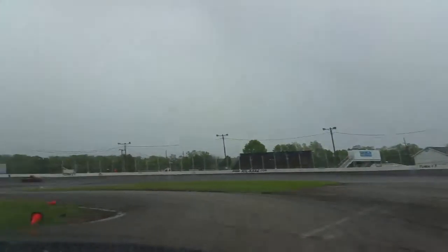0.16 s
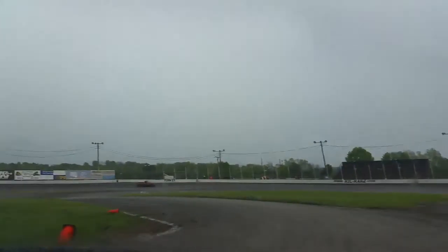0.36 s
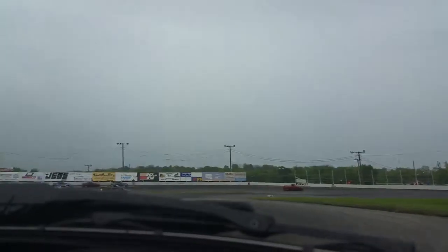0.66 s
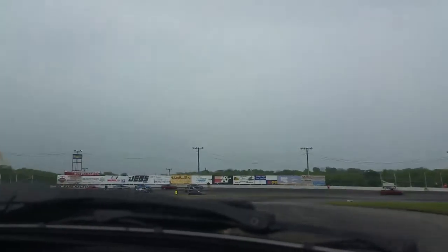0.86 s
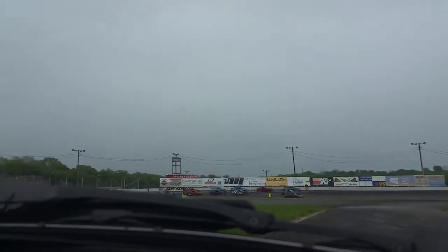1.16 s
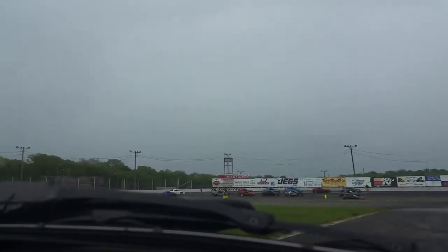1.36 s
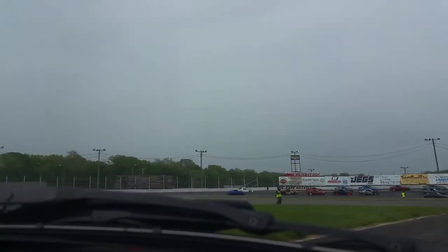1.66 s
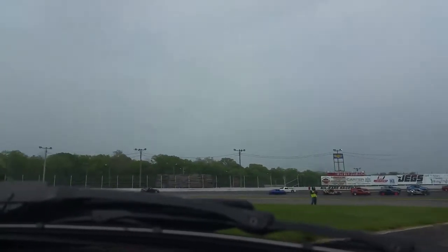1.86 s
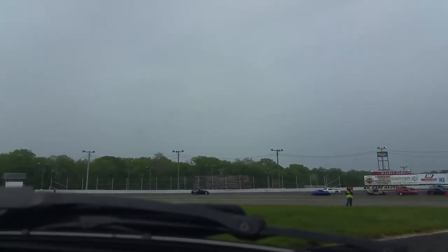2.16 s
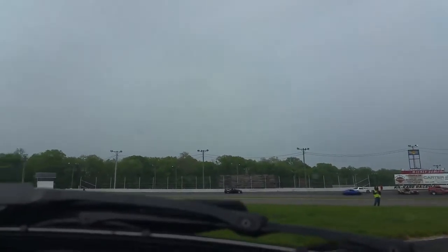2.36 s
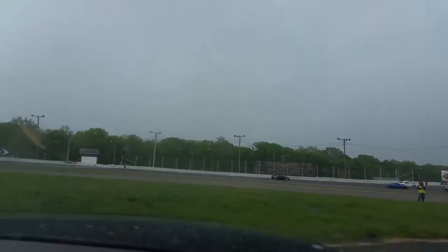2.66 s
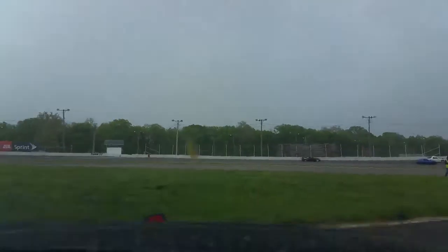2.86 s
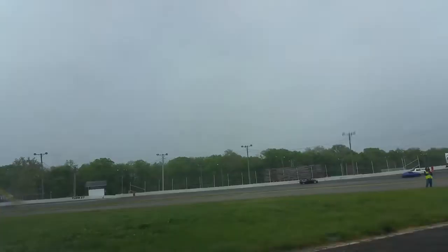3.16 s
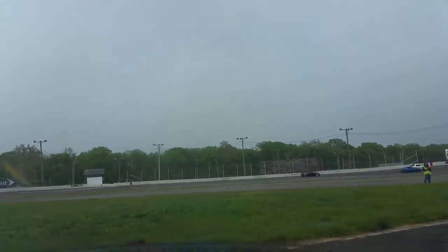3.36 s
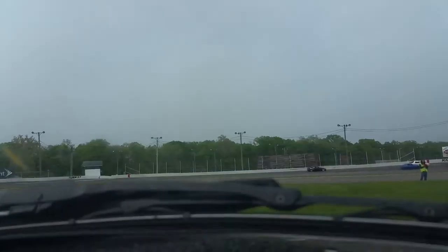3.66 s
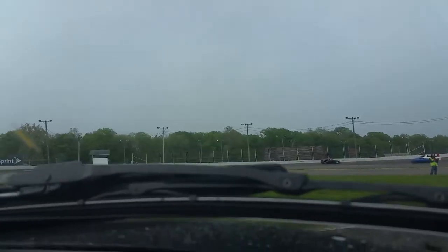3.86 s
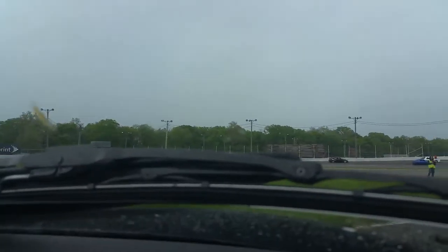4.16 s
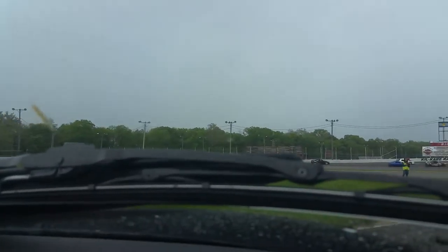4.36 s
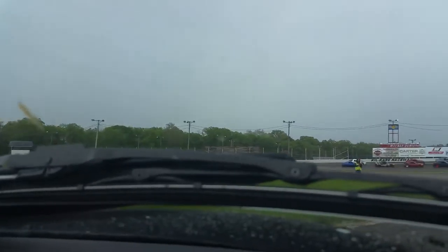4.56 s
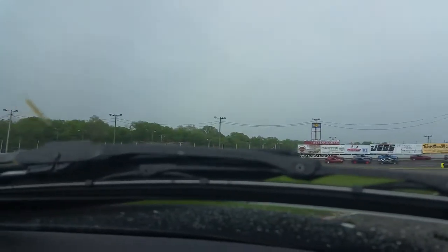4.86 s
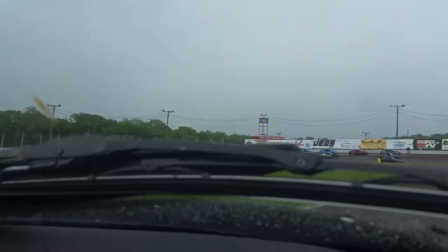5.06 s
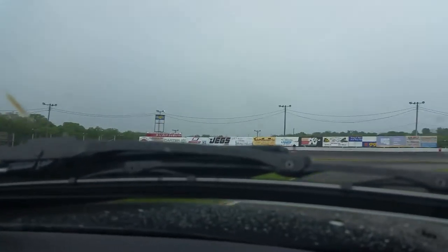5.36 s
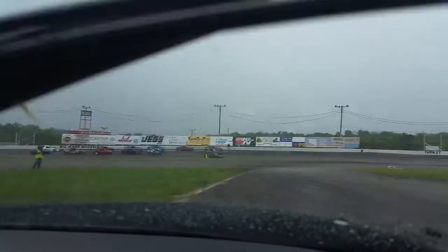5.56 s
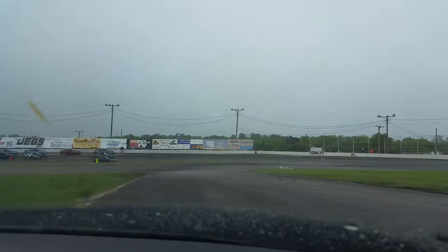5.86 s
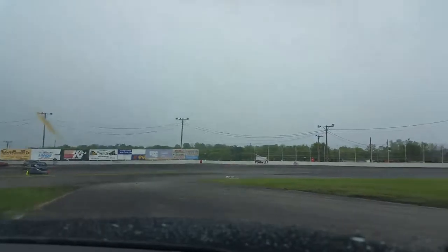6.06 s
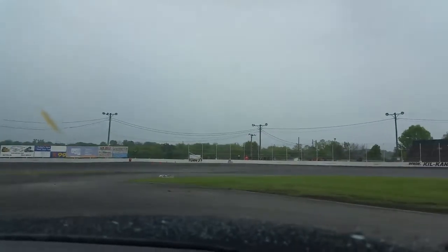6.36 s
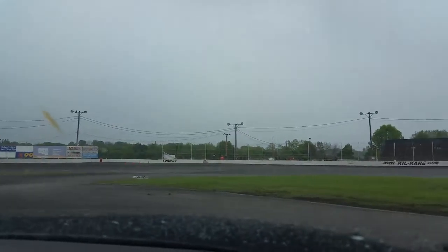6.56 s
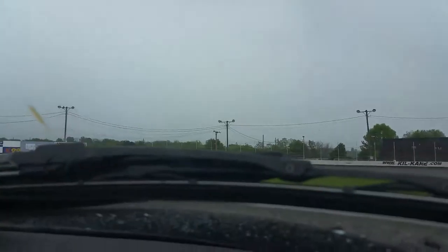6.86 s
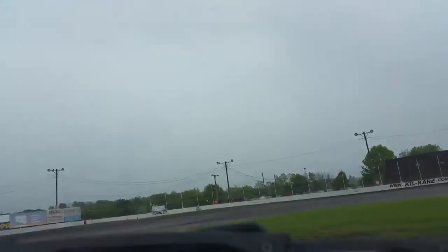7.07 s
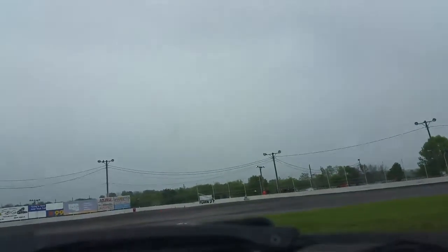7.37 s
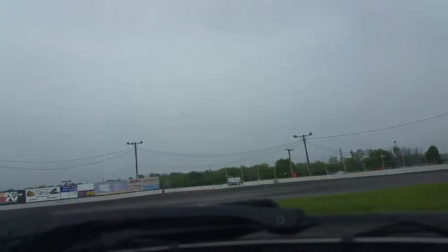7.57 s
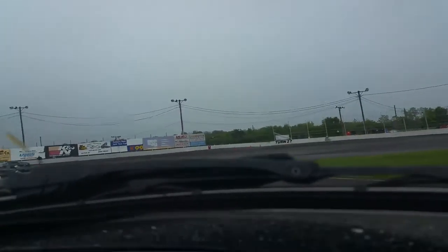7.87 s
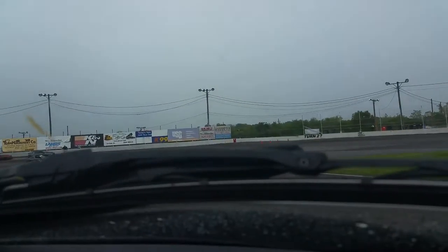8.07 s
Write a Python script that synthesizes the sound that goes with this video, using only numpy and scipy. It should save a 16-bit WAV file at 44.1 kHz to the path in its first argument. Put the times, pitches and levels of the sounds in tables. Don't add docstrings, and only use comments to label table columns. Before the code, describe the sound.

A V8 car heard from the dashboard: wide, wavering tyre howl for over two seconds, engine dropping beneath it. Quieter rolling follows with trim ticks and two sharp lever knocks. Then a fast rev, short double-pitched chirps, a drop, and a longer climbing roar with thinner squeal. Heavy thumps at the turn, gear whine, and a final growing slide over hissing water.

```python
import sys
import numpy as np
from scipy import signal
from scipy.fft import rfft, irfft
from scipy.io import wavfile
from scipy.ndimage import uniform_filter1d

SR = 44100
rng = np.random.default_rng(int(sys.argv[2]) if len(sys.argv) > 2 else 0)


def boost(x):
    u = np.asarray(x, float) / 20
    return 10 ** u


def digitize_waveform(pressure):
    field = np.atleast_2d(pressure).T
    bounded = np.clip(field, -1, 1)
    quanta = np.round(bounded * 32767).astype(np.int16)
    wavfile.write(sys.argv[1], SR, quanta)


N = 362061

# [t/s, stick-slip rate f/Hz, level/dB, overtone level/dB]
LONG_SLIDE = [
    (0, 913, -14, -18.5),
    (.2, 815.6, -16.5, -16),
    (.5, 779.2, -14.5, -16.5),
    (1.0, 847.4, -15, -15),
    (2.05, 861.5, -15, -15),
    (2.2, 876, -17, -18),
    (2.35, 881, -26, -22),
    (2.5, 879, -39, -11),
    (2.69, 866, -44.5, -12),
    (2.75, 870, -60, -9),
]
LEFT_CHIRP = [(4.46, 1065, -47, -2), (4.52, 1085, -30, -21), (4.58, 1060, -24, -10), (4.62, 1085, -27, -2),
              (4.7, 1098, -28, -2), (4.76, 1096, -31.5, -14), (4.83, 1112, -34, -18),
              (4.89, 1046, -31.5, 3.5), (4.93, 1092, -35.5, 3), (5.0, 1100, -46, 4), (5.08, 1105, -60, 4)]
RIGHT_CHIRP = [
    (4.46, 1226, -48, -16),
    (4.521, 1235, -24, -18),
    (4.58, 1210, -21.5, -18),
    (4.629, 1253, -32.5, -9),
    (4.70, 1244, -28, -38),
    (4.80, 1270, -27.5, -17),
    (4.839, 1230, -39, -14),
    (4.9, 1190, -40, 0),
    (4.95, 1210, -47, -15),
    (5.198, 1240, -40.5, -18),
]
POWER_SLIDE = [
    (5.15, 1271, -46, -3),
    (5.72, 1298, -39.5, -8),
    (5.95, 1287, -33, -14.5),
    (6.15, 1219, -30.5, -18),
    (6.4, 1212, -25.5, -16.5),
    (6.65, 1220, -26, -14),
    (6.85, 1221, -24.5, -13.5),
    (6.96, 1238, -33.5, -12.5),
    (7.05, 1263, -50, -11),
]
LAST_SLIDE = [
    (7.3, 1039, -54, -9),
    (7.45, 1070, -43, -7),
    (7.64, 1083, -39.5, -4),
    (7.72, 1069, -38, -1.5),
    (7.79, 1036, -26.5, -12),
    (7.95, 1033, -29, -8.5),
    (8.0, 1008, -24.5, -12.5),
    (8.08, 964, -26, -15.5),
    (8.21, 1018, -22.5, -11),
]

# [t/s, opening 0-1]
THROTTLE = [(0, .6), (.95, .5), (1.3, .2), (3.8, .15), (3.92, .85), (4.2, 1), (4.55, 1), (4.7, .5),
            (5.1, .7), (5.3, .95), (6.1, 1), (6.85, 1), (6.95, .5), (7.35, .7), (7.5, .9), (7.75, .9),
            (7.9, .6), (8.0, .9), (8.21, .95)]
# [t/s, f/Hz]
CYCLE_RATE = [(0, 20.2), (.1, 18.3), (.35, 13.7), (.55, 12.4), (.95, 11.2), (3.6, 10), (3.9, 11),
              (4.0, 15.2), (4.21, 19.7), (4.39, 21.5), (4.58, 20.2), (4.87, 12.5), (5.05, 8.9), (5.19, 9.6),
              (5.88, 15.6), (6.0, 18), (6.24, 21.6), (6.7, 25.6), (6.87, 25.9), (7.0, 20.7), (7.3, 17.4),
              (7.8, 14.7), (8.0, 14.6), (8.21, 13.8)]
FIRING_BANK = [1, -1, -1, 1, -1, 1, 1, -1]
CYLINDER_DB = [4, -6, 3.5, 2, 11, -0.5, -1, 12]
# [t/s, near-bank lead 0-1, cylinder unevenness (1 = usual)]
LUMP = [
    (0, 0.44, 0.7),
    (4.0, 0.1, .6),
    (4.4, 0.57, 0.86),
    (5.3, 0.47, 0.8),
    (6.2, 0.23, 0.74),
    (6.6, 0.65, 3.25),
    (7.2, 0.27, 1.2),
    (7.75, 0.32, 1.6),
    (8.0, .5, 0.5),
    (8.21, 0.37, 0.43),
]
# [t/s, boom level/dB, body shake level/dB]
EFFORT = [(0, -20, -2), (.35, -28.5, 0), (1.15, -28, 0), (1.3, -37.5, 0), (2.0, -33, 0), (2.6, -36.5, 0),
          (3.55, -32, 0), (3.63, -26.5, 0), (3.88, -27, 0), (4.0, -14, 0), (4.55, -16.5, -1),
          (4.75, -22, 1), (5.5, -21.5, 1), (6.1, -14, 1), (6.85, -14.5, -2), (7.3, -20.5, 3),
          (7.93, -22, 0), (8.21, -15.5, -2)]
# [f/Hz, level/dB]
CABIN_RESPONSE = [(15, -31.5), (25, -9.5), (81, -0.5), (124, -3), (155, 3), (198, -2), (226, 3), (243, -9),
                  (264, -11.5), (308, -10.5), (358, -15), (412, -8.5), (530, -21), (576, -22), (700, -44.5),
                  (910, -90), (1540, -120)]
# [f/Hz, width/Hz, level over broad response/dB]
CABIN_MODES = [(96, 18, 3), (163, 26, 3), (236, 34, 10), (408, 30, 8), (465, 30, 4), (575, 30, 6)]
# [multiple of cycle, mode f/Hz, width/Hz, gain/dB]
DRONES = [(8, 167.5, 13.4, 6.5), (16, 212.5, 18.4, 5.5)]
# [start t/s, end t/s, multiple of cycle, level/dB]
SINGING = [(-.1, .17, 8, -24), (-.1, .22, 11, -28), (.05, .45, 4, -32), (4.25, 4.62, 11, -22),
           (4.22, 4.57, 19, -32), (4.25, 4.52, 27, -38), (5.15, 5.6, 8, -31), (5.55, 5.92, 16, -25),
           (5.5, 5.85, 5, -25), (6.08, 6.37, 11, -23), (6.25, 6.62, 3, -29), (6.3, 6.62, 10, -25),
           (6.53, 6.92, 9, -20), (6.5, 6.92, 16, -28), (6.55, 6.97, 6, -30), (6.48, 6.8, 23, -40),
           (6.15, 6.4, 21, -32), (7.38, 7.82, 6, -24), (7.5, 7.85, 12, -28), (7.4, 7.9, 14, -30),
           (7.93, 8.3, 5, -21), (8.0, 8.3, 16, -19), (7.95, 8.3, 10, -23), (8.0, 8.3, 30, -29)]

# [t/s, spray level/dB, rolling tyre load level/dB]
SPRAY = [(0, -53, -1.5), (.5, -50.5, 2), (1.46, -48.5, -0.5), (1.9, -54.5, 3), (2.3, -60, -1.5),
         (2.75, -62, -2.5), (2.92, -66, 4), (3.2, -65, 0.5), (3.43, -59, -3.5), (3.9, -58, -2),
         (4.3, -54, 0), (4.94, -56.5, 4), (5.3, -53, -2), (5.85, -51.5, -2.5), (6.17, -52.5, 1),
         (6.7, -50.5, 3), (7.25, -54.5, 1), (7.5, -48, -2), (7.75, -48, -6.5), (8.21, -47.5, -6.5)]
# [f/Hz, level/dB]
HISS = [(290, -36), (500, -11), (578, -20.5), (678, -7.5), (795, 3), (880, -4.5), (1360, -22),
        (1670, -13.5), (3540, -25), (4940, -26.5), (16000, -50)]
# [f/Hz, left minus right level/dB]
PORT_TILT = [(60, 2.0), (110, 2.0), (200, 1.5), (380, -7), (700, -1.5), (1290, -8.5), (2380, 5),
             (4400, -9.5), (8120, -3.5), (15000, -1)]
# [t/s, peak level/dB, length/s]
RUSTLES = [(0.173, -61.5, 0.062), (0.271, -59.5, 0.067), (0.413, -57.5, 0.042), (1.502, -70, 0.21),
           (2.821, -55, 0.039), (3.064, -56.5, .02), (4.357, -60.5, 0.16), (5.84, -58.5, .09),
           (6.289, -69.5, 0.13), (7.084, -63.5, 0.1), (8.076, -57, 0.086), (8.21, -62, 0.022)]

# [t/s, peak level/dB, left minus right level/dB]
TICKS = [(0.628, -28, -8.5), (2.0606, -42, -12), (2.7254, -28.5, 1), (2.7616, -28.5, 1), (2.7856, -36, 1.5),
         (2.9427, -21.5, -0.5), (3.2423, -37.5, -8), (3.4322, -44.5, -1), (3.51, -46, -5), (3.218, -37, 0),
         (4.2745, -42, 2.5), (4.298, -29, -9.5), (4.3282, -35, -10.5), (4.341, -32, 1), (5.493, -46.5, -16),
         (5.864, -29, -4.5), (6.412, -30, -2.5), (6.558, -38.5, -11.5), (7.127, -22, -0.5),
         (7.1784, -36, -4.5), (7.546, -45.5, -3)]
# [t/s, peak level/dB, thud above peak/dB, crack above peak/dB, length/s]
KNOCKS = [(2.704, -22, -10, -32, 0.0041), (2.716, -15.5, -16, -32, 0.0015), (2.821, -45, -9, 0, 0.008),
          (2.938, -8.5, -19, -20, 0.006), (2.953, -21, 6, -18.5, 0.0069), (2.97, -25, 0, -18.5, 0.0088),
          (3.436, -29.5, 5, -29.5, .005), (3.2205, -10, 4, -20, 0.0071), (3.2335, -22.5, 10, -15.5, 0.0066),
          (3.2402, 0, -25, -28, 0.0016), (3.244, -12, -9, -37.5, 0.013), (7.095, -32, -9, -4, .012),
          (7.1275, -10, 0, -20, 0.002), (7.338, -36, -9, -6, .006), (7.178, -10, -20, -37, 0.002)]
# [f/Hz, level/dB, t60/s]
LATCH_MODES = [(746, 0.5, 0.049), (974, -3.5, 0.044), (1350, -2, 0.019), (1927, -15, .05), (2380, -15, .05),
               (3250, 0, .018), (4300, -16, .008), (5600, -16, .006)]
# [t/s, peak level/dB, pitch f/Hz]
BUMPS = [
    (2.943, -17.5, 73.2),
    (3.223, -28, 90),
    (3.9, -10.5, 92.4),
    (6.985, -8, 70.2),
    (7.025, -9, 50.6),
    (7.063, -5.5, 112.7),
    (7.129, -13, 131.7),
]
# [t/s, peak level/dB]
SQUEAKS = [(4.5937, -40.5), (4.696, -29.5), (4.8285, -33.5), (4.971, -34.5), (5.096, -33), (5.164, -43),
           (5.235, -33), (5.304, -33.5), (5.377, -31), (5.459, -34.5), (5.5172, -38), (5.5545, -46),
           (5.6086, -44), (5.6656, -40), (5.738, -31.5), (5.8193, -49), (5.8619, -44.5), (6.0428, -38),
           (6.153, -42.5), (6.2315, -39.5), (6.3048, -43), (6.3665, -40), (6.4629, -43), (6.667, -49),
           (6.717, -39), (6.911, -38)]
# [start t/s, end t/s, mesh from f/Hz, mesh to f/Hz, level/dB]
WHINES = [
    (4.8, 5.75, 488, 552, -47),
    (7.3, 7.7, 481, 520, -34),
]
GEAR_ORDERS = [(2, -3), (3, 0), (4, -10)]

SIDES = np.array([[1], [-1]])


def level(x, db):
    return x * boost(db) / np.sqrt(np.mean(x ** 2))


def steady(x, window_s):
    k = int(window_s * SR)
    power = uniform_filter1d(uniform_filter1d(x ** 2, k), k)
    return x / np.sqrt(power + 1e-12)


def curves(table):
    s, *columns = np.transpose(table)
    return [np.interp(np.arange(N) / SR, s, c) for c in columns]


def at(table, hz):
    f, db = np.transpose(table)
    return np.interp(np.log(hz + 1), np.log(f + 1), db)


def band(x, lo_hz, hi_hz, order=2):
    sos = signal.butter(order, [lo_hz, min(hi_hz, .45 * SR)], "band", fs=SR, output="sos")
    return signal.sosfilt(sos, x)


def colour(x, table):
    cepstrum = irfft(np.log(boost(at(table, np.linspace(0, SR / 2, 8193)))))
    cepstrum[1:8192] *= 2
    cepstrum[8193:] = 0
    impulse = irfft(np.exp(rfft(cepstrum)))[:8192]
    return signal.fftconvolve(x, impulse)[:N]


def walk(rate_hz, size=N):
    k = int(SR / rate_hz)
    held = np.repeat(rng.standard_normal(size // k + 1), k)
    return 1.3 * uniform_filter1d(uniform_filter1d(held, k), k)[:size]


def ears(x, pan_db, lag=0):
    return np.array([x * boost(pan_db / 2), np.roll(x, lag) * boost(-pan_db / 2)])


def add(out, s, sound):
    a = int(s * SR)
    out[:, a:a + sound.shape[1]] += sound[:, :N - a]


def slide(table, spread, count, scrub_db=-49.0, third=0.58, skew=0.54, patchy_db=4.5, rate_hz=45,
          side_db=-0.2, core_db=-3.5, low_db=0.0, shimmy=.013, edge_db=1.9, judder_db=1.0, thin_db=2.5,
          lag_s=.0004):
    a, b = int(table[0][0] * SR), min(int(table[-1][0] * SR), N)
    size = b - a
    hz, db, overtone_db = (c[a:b] for c in curves(table))
    spread = np.interp(np.linspace(0, len(spread) - 1, size), np.arange(len(spread)), spread)
    hz = hz * (1 + shimmy * walk(22, size))
    third_gain = third * np.clip(spread / .07, 0, 1)
    tones = np.zeros((2, 2, size))
    for place in np.linspace(-1, 1, count):
        off = 1.4 * place + skew * place ** 2
        off = off + .12 * walk(12, size) + .35 * abs(place) * walk(150, size)
        jitter = np.minimum(.0116, 0.355 * spread) * walk(90, size)
        phase = np.cumsum(2 * np.pi / SR * hz * (1 + spread * off + jitter))
        place_db = -3.3 * abs(place) - edge_db * place ** 2 + core_db * np.exp(-30 * place ** 2)
        grip = boost(patchy_db * walk(rate_hz, size) + place_db)
        lag = int(SR * (lag_s + .0001 * rng.standard_normal()))
        pan_db = -4.5 + 2.2 * rng.standard_normal()
        overtones = np.sin(2 * phase) + third_gain * np.sin(3 * phase)
        overtones = overtones * grip * boost(-low_db * place - thin_db * place ** 2)
        tones[0] += ears(grip * np.sin(phase), pan_db, lag)
        tones[1] += ears(overtones, pan_db, lag)
    tones /= np.sqrt(uniform_filter1d((tones ** 2).mean(axis=1, keepdims=True), SR // 5) + 1e-9)
    scrub = band(rng.standard_normal((2, size)), 0.8 * hz.mean(), 1.47 * hz.mean(), order=3)
    scrub = level(scrub, scrub_db) * boost(2.7 * walk(39.66, size))
    sound = tones[0] + tones[1] * boost(overtone_db) + scrub
    fade = signal.windows.tukey(size, 2000 / size)
    out = np.zeros((2, N))
    out[:, a:b] = sound * boost(db + 5.5 + judder_db * walk(70, size)) * fade
    return out * boost(side_db / 2 * SIDES)


def tyres():
    long = slide(LONG_SLIDE, [.075, .105, .12, .12, .105, .06, 0.028, 0.018], count=16, scrub_db=-16,
                 skew=.35, patchy_db=4.3, side_db=0.0, core_db=4.5, edge_db=1.5, third=0.3, judder_db=1.0,
                 thin_db=4, lag_s=.00035) * boost(-1.2)
    power = slide(POWER_SLIDE, [.1, .07, .085], count=10, scrub_db=-16.0, skew=.1, patchy_db=4.5,
                  rate_hz=40, low_db=4.5, third=0.14, edge_db=3, thin_db=-0.5)
    last = slide(LAST_SLIDE, [.04, .075, .075], count=11, third=0.55, skew=0.5, patchy_db=4.8,
                 core_db=2.2, scrub_db=-19, edge_db=.6, thin_db=14, low_db=-1.5)
    dry = long + power + last
    for table in (LEFT_CHIRP, RIGHT_CHIRP):
        dry = dry + slide(table, [.022, .022], count=5, core_db=5, patchy_db=3.5, scrub_db=-17.0, third=0.03,
                          rate_hz=55, shimmy=.002, skew=0.0, lag_s=.0003, judder_db=2.0)
    echoes = rng.standard_normal((2, 4000)) * np.exp(-np.arange(4000) / SR / .022) * boost(-41)
    echoes[:, 0] = 0.74
    return signal.fftconvolve(dry, echoes, axes=1)[:, :N]


def cabin(x):
    x = colour(x, CABIN_RESPONSE)
    modes = [boost(db) * signal.lfilter(*signal.iirpeak(hz, hz / width_hz, fs=SR), x)
             for hz, width_hz, db in CABIN_MODES]
    return x + sum(modes)


def passing(hz, mode_hz, width_hz):
    return 1 / (1 + ((hz - mode_hz) / width_hz) ** 2)


def loudness(cycle_hz, throttle):
    effort_db, shake_db = curves(EFFORT)
    drone_db = sum(db * passing(k * cycle_hz, hz, width_hz) for k, hz, width_hz, db in DRONES)
    boom_db = effort_db + throttle * drone_db
    shudder_db = -35.5 + shake_db + 0.82 * (effort_db + 30) + 4 * throttle - 0.05 * (cycle_hz - 12)
    floor_hz, floor_width_hz = 91.5, 20
    for order, gain_db in [(8, 7.2), (6, 3.4)]:
        shudder_db = shudder_db + throttle * gain_db * passing(order * cycle_hz, floor_hz, floor_width_hz)
    bark_db = -11.5 - 2.5 * throttle + 0.42 * (cycle_hz - 12)
    return boom_db, shudder_db - boom_db, bark_db


def firings(cycle_hz, throttle):
    far_pipe_s = 0.0008
    count = np.floor(np.cumsum(8 * cycle_hz / SR)).astype(int)
    when = np.flatnonzero(np.diff(count)) + 1
    cylinder = count[when] % 8
    bank = np.take(FIRING_BANK, cylinder)
    chance = rng.standard_normal((3000, 2))[:len(when)].T
    slack = 1 - throttle[when]
    lead, uneven = (c[when] for c in curves(LUMP))
    size = (1 + np.clip(lead, 0, 1) * bank) * boost(uneven * np.take(CYLINDER_DB, cylinder))
    size = size * boost((1.7 + 3.0 * slack) * chance[0])
    late_s = (.00018 + .001 * slack) * chance[1] + far_pipe_s * (bank < 0)
    late = (SR * late_s).astype(int)
    pulses = np.bincount(np.clip(when + late, 0, N - 1), size, N)
    return pulses, np.bincount(when, bank, N)


def singing(sound, cycle_hz):
    swell_s, waver_db, ring = .07, 3.2, int(.06 * SR)
    out, t = np.zeros(N), np.arange(N) / SR
    turn = np.cumsum(2 * np.pi * cycle_hz / SR)
    for start, end, k, db in SINGING:
        a, b = max(int(start * SR), 0), min(int(end * SR), N)
        to_edge_s = np.minimum(t[a:b] - start, end - t[a:b])
        on = np.sin(np.pi / 2 * np.clip(to_edge_s / swell_s, 0, 1)) ** 2
        order = np.exp(1j * k * turn[a:b])
        share = uniform_filter1d(uniform_filter1d(sound[a:b] / order, ring), ring)
        tone = (order * share / np.abs(share)).real
        out[a:b] += np.sqrt(2) * on * boost(db + waver_db * walk(14, SR)[:b - a]) * tone
    return out


def engine():
    flywheel_s = .07
    cycle_hz = uniform_filter1d(curves(CYCLE_RATE)[0], int(flywheel_s * SR), mode="nearest")
    throttle, = curves(THROTTLE)
    boom_db, shudder_db, bark_db = loudness(cycle_hz, throttle)
    pulses, bank_pulses = firings(cycle_hz, throttle)
    firing = steady(cabin(pulses), 0.071)
    rumble = steady(colour(rng.standard_normal(N) * boost(1.0 * walk(5.8)), CABIN_RESPONSE), 0.058)
    clean = .15 + .83 * throttle
    mix = np.sqrt(clean) * firing + np.sqrt(1 - clean) * rumble
    rocking = steady(cabin(bank_pulses), 0.14)
    rock_gain = .7 * throttle ** 2 * np.clip(cycle_hz / 5 - 2.6, .15, 1)
    shudder = steady(band(mix + rock_gain * rocking, 28, 115), .2) * boost(boom_db + shudder_db)
    boom = steady(band(mix, 151.6, 332.5, order=3), 0.088) * boost(boom_db)
    bark = steady(band(mix, 323.3, 648, order=3), 0.17) * boost(boom_db + bark_db)
    rasp_db = -29 + .5 * (cycle_hz - 20) - 25 * (1 - throttle)
    bark = bark + steady(band(pulses, 730, 870), .15) * boost(boom_db + rasp_db)
    boom = boom + singing(shudder + boom + bark, cycle_hz)
    apart = steady(colour(rng.standard_normal(N), CABIN_RESPONSE), .3) * boost(boom_db - 21.5) * SIDES
    return ears(shudder + boom, 1.9, lag=-2.4) + ears(bark, .1, lag=-9.5) + apart


def wetness():
    t = np.arange(N) / SR
    spray_db, load_db = curves(SPRAY)
    slewing_db = 13 * np.exp(-t / 1.42)
    drone_db = -43.5 + load_db + 0.99 * (spray_db + 56.0) + slewing_db
    brush = sum(boost(2 * db) * np.exp(-((t - s) / length_s) ** 2 * 4) for s, db, length_s in RUSTLES)
    rustle_db = 10 * np.log10(boost(2 * (spray_db - 21)) + brush)
    return spray_db, drone_db, rustle_db


def spray():
    spray_db, drone_db, rustle_db = wetness()
    top_db_per_octave = 17
    out, shared = 0, walk(11)
    grit = boost(2.5 * rng.exponential(1, N // 40 + 1).repeat(40)[:N])
    for hz in 560 * 2 ** np.arange(0, 5, 1 / 3):
        noise = rng.standard_normal((2, N)) * grit ** min(hz / 9000, 1)
        drone = np.clip(np.log2(3500 / hz) / 0.84, 0, 1)
        rustle = np.clip(np.log2(hz / 6500) / .5, 0, 1)
        db = at(HISS, hz) - at(HISS, 6475) + spray_db - 6.5 + 1.2 * shared + 2.1 * walk(34)
        db = db + drone * (drone_db - spray_db - 12.5) + rustle * (rustle_db - spray_db + 8.0)
        db = db + top_db_per_octave * max(np.log2(hz / 9000), 0)
        tilt = boost(at(PORT_TILT, hz) / 2 * SIDES)
        hiss = level(band(noise, hz / 1.186, hz * 1.199), 10 * np.log10(hz / 5500))
        out = out + hiss * boost(db) * tilt
    return out


def trim():
    tick_body_db = -18
    out, t = np.zeros((2, N)), np.arange(4000) / SR
    for s, db, pan_db in TICKS:
        noise = rng.standard_normal((2, 4000)) * (np.exp(-t / 0.00066) + 0.11 * np.exp(-t / 0.0086))
        tick = band(noise, 2100, 10500) + boost(tick_body_db) * 2 * band(noise, 1200, 2600)
        add(out, s, boost(db + 6.0) * tick * boost(pan_db / 2 * SIDES))
    for s, db, thud_db, crack_db, length_s in KNOCKS:
        noise = rng.standard_normal((3, 4000)) * np.exp(-t / max(length_s, .001))
        thud = -np.exp(-t / 0.006) * (np.sin(2 * np.pi * 205 * t) + 0.35 * np.sin(2 * np.pi * 95 * t))
        knock = 1.08 * band(noise[:2] + noise[2], 240, 1400)
        crack = 3.5 * band(noise[:2], 1800, 5800)
        add(out, s, boost(db) * (knock + boost(crack_db) * crack + boost(thud_db) * thud))
    return out


def latch():
    out, t, ring = np.zeros((2, N)), np.arange(4000) / SR, 0
    for hz, db, t60_s in LATCH_MODES:
        turns = hz * t + rng.random((2, 1)) * min(hz / 3000, 1)
        ring = ring + boost(db - 60 * t / t60_s) * np.sin(2 * np.pi * turns)
    scrape = rng.standard_normal((1, 300)) * np.exp(-np.arange(300) / SR / .002) / 5.9
    add(out, 2.9395, boost(-14.5) * signal.fftconvolve(ring, scrape, axes=1))
    return out


def bumps():
    out, t = np.zeros((2, N)), np.arange(5000) / SR
    for s, db, hz in BUMPS:
        thump = np.exp(-t / 0.037) * np.sin(2 * np.pi * hz * t)
        add(out, s, ears(boost(db - 4.0) * thump, 3.6))
    return out


def squeaks():
    mode_hz, scatter = 3804, .007
    out, t = np.zeros((2, N)), np.arange(3000) / SR
    for s, db in SQUEAKS:
        hz = mode_hz * (1 + scatter * rng.standard_normal())
        shape = np.clip(t / .012, 0, 1) * np.exp(-(t / .038) ** 2) * boost(3.5 * walk(260, size=3000))
        wobble = .004 * walk(60, size=3000) + .011 * walk(500, size=3000)
        phase = np.cumsum(2 * np.pi / SR * hz * (1 + wobble))
        tone = np.sin(phase) + boost(-16.0) * np.sin(2 * phase) + boost(-32.0) * np.sin(3 * phase)
        add(out, s - .009, ears(boost(db) * shape * tone, -4.5, lag=2.4))
    return out


def gears():
    out, t = 0, np.arange(N) / SR
    for start, end, from_hz, to_hz, db in WHINES:
        on = np.clip(np.minimum(t - start, end - t) / 0.073, 0, 1) * boost(db + 2.8 * walk(18))
        mesh_hz = np.interp(t, [start, end], [from_hz, to_hz]) * (1 + 0.0028 * walk(15))
        tones = sum(boost(g) * np.sin(np.cumsum(2 * np.pi * k / 3 * mesh_hz / SR)) for k, g in GEAR_ORDERS)
        out = out + np.sqrt(2) * on * tones
    return ears(out, -.4)


def scene():
    return tyres() + engine() + spray() + trim() + latch() + bumps() + squeaks() + gears()


def limit(x):
    return x / (1 + np.abs(x / .9) ** 4) ** .25


def top_cut(x):
    return signal.sosfilt(signal.butter(12, 15830, fs=SR, output="sos"), x)


def record(dry):
    mix = limit(dry)
    return top_cut(mix)


dry = scene()
out = record(dry)
digitize_waveform(out)
```